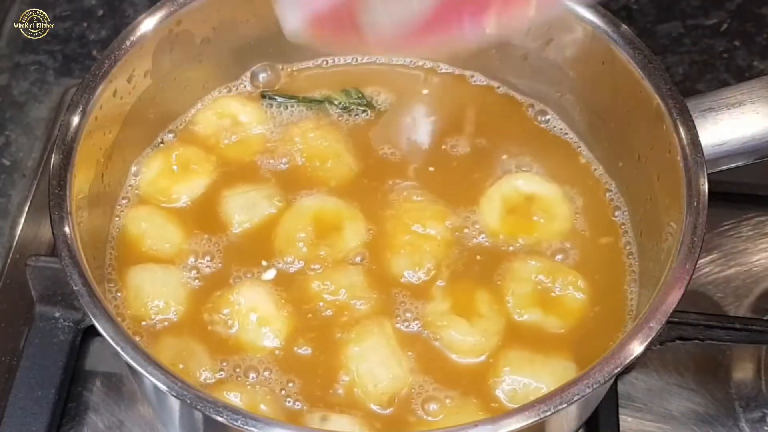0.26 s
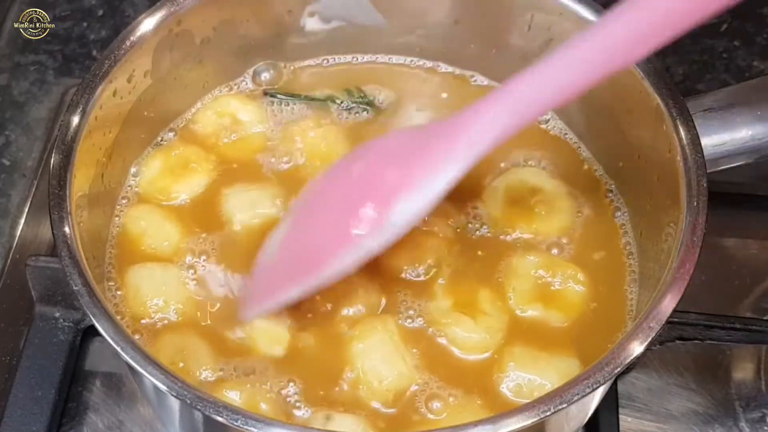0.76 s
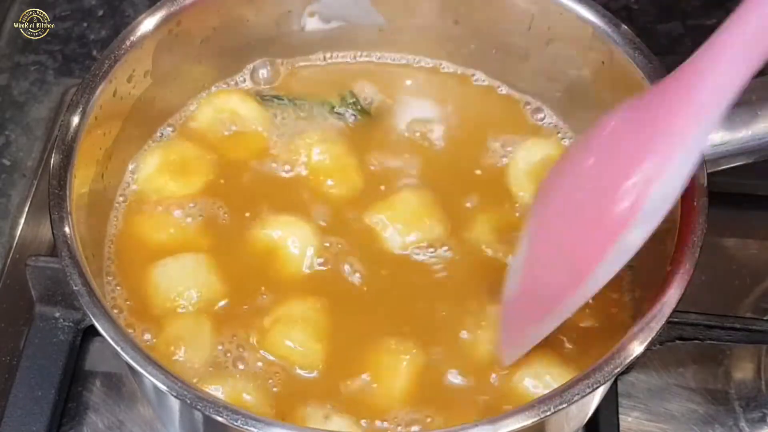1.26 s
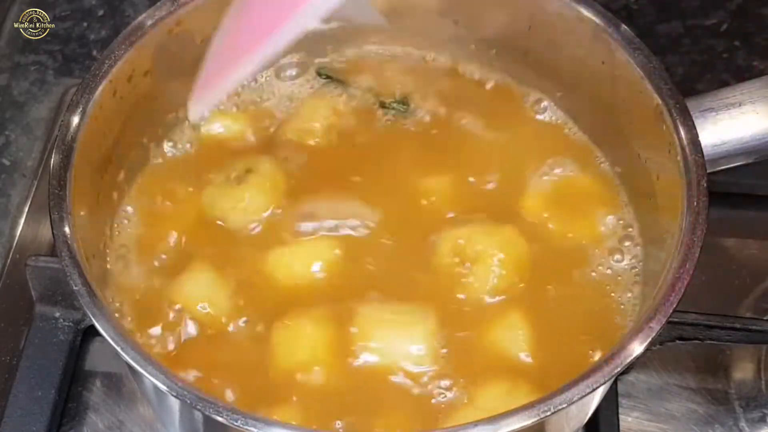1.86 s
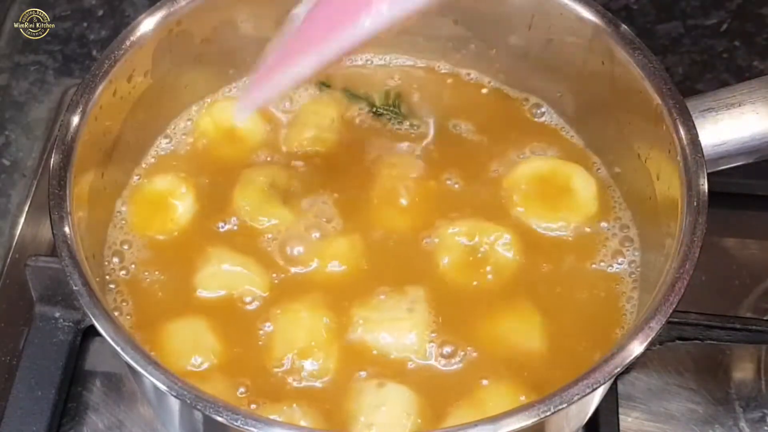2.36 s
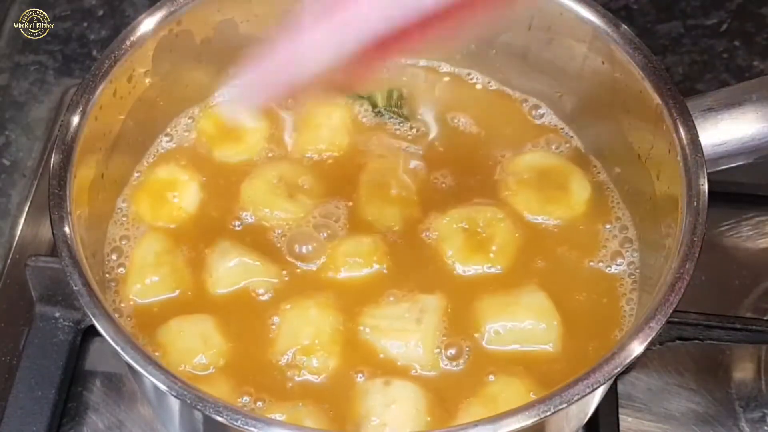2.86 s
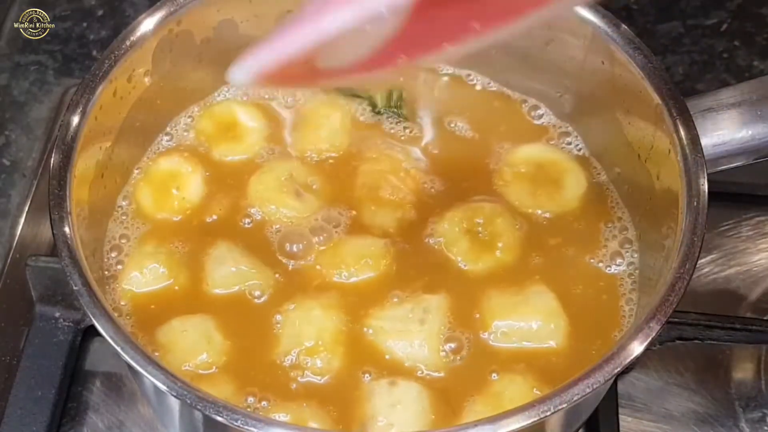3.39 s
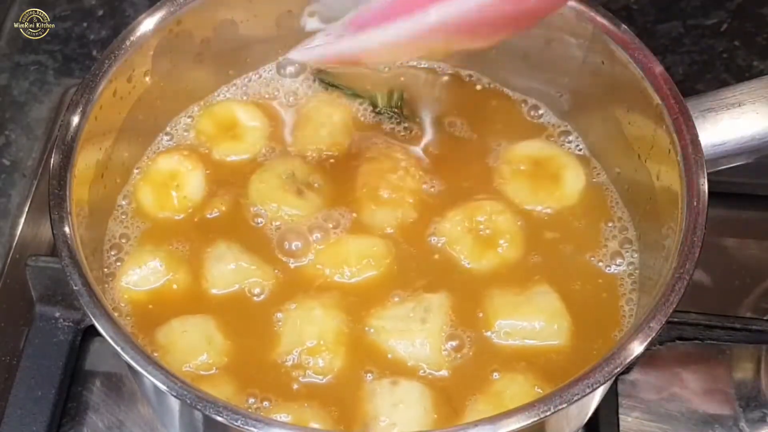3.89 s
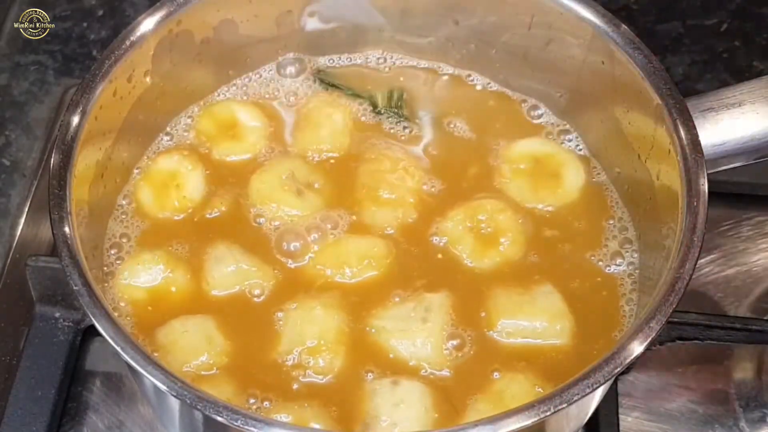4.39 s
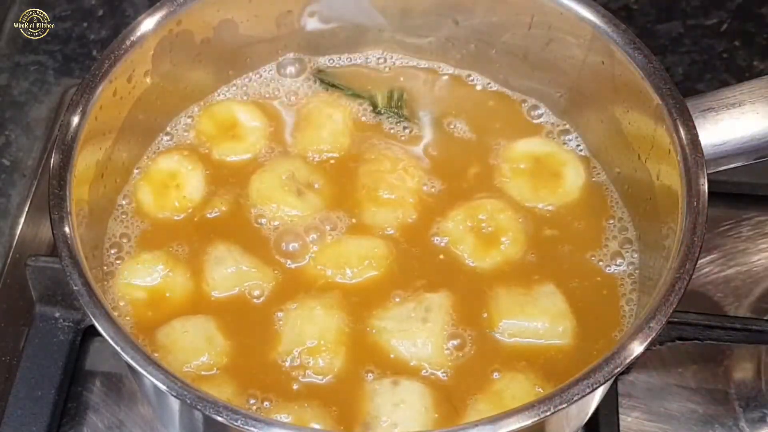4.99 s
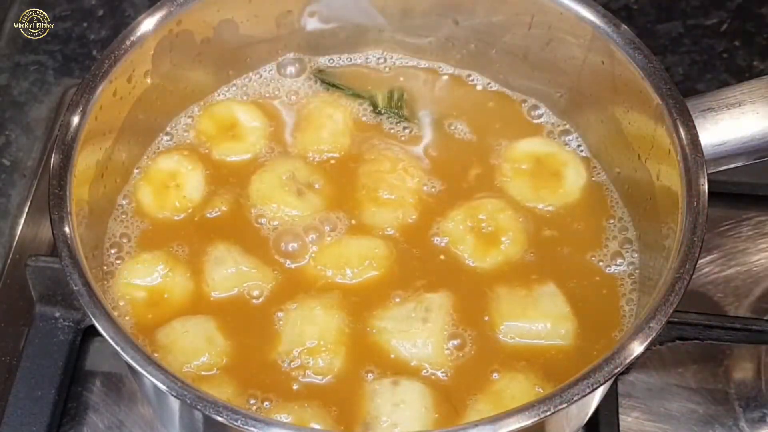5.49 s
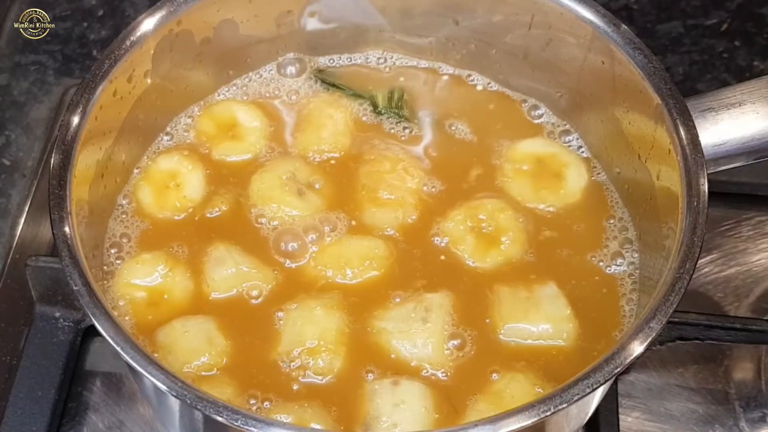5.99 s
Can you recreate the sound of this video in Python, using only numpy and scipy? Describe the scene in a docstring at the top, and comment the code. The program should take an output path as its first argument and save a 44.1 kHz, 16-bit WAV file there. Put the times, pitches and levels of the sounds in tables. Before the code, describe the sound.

A saucepan of syrup simmers over a gas burner, heard close in stereo in a small kitchen. Throughout, a deep flame roar around 100 Hz wanders irregularly by a few decibels, with a low-mid flutter and a steady, bright, wide hiss and fizz from the gas jets. Barely audible tiny bubbles tick at random across the pan. At about 1.27 s a soft spoon bumps the pan with a dull, muffled double knock; from 1.42 to 1.6 s syrup slops and quick rising bubbles plop. A small bubble at 2.7 s precedes a light, faint knock at 2.8 s. One faint plop comes at 4.2 s. Near 5.08 s a clearer woody thud lands with two weaker follow-ups, then a plop at 5.18 s. Between 5.47 and 5.63 s a soft rub and a cluster of low, rounded bubbles burst. The burner continues to the end, just past 6 s.

```python
"""In a kitchen, a saucepan of syrup simmers on a gas burner close to a two-port microphone.
The flame roars and flutters low and the gas jets hiss and fizz: shaped stereo noise, randomly wobbling in level.
Bubbles burst as short rising sines. A soft spoon bumps the pan and something thuds nearby: decaying modes.
The syrup slops and something soft shuffles: lumpy filtered noise. A short room tail follows these events."""
import sys
import numpy as np
from scipy import signal
from scipy.fft import rfft, irfft, next_fast_len
from scipy.io import wavfile
from scipy.ndimage import uniform_filter1d, map_coordinates

SR = 44100
rng = np.random.default_rng(int(sys.argv[2]) if len(sys.argv) > 2 else 0)


def generate_wav(sig):
    """Save sig (samples, or channels by samples) to the path in sys.argv[1] as 16-bit PCM at SR."""
    pcm = np.round(np.clip(np.atleast_2d(sig).T, -1, 1) * 32767).astype(np.int16)
    wavfile.write(sys.argv[1], SR, pcm)


N = 275625  # samples, 6.25 s


def amp(db):
    """Gain of a level in dB."""
    return 10 ** (np.asarray(db) / 20)


def unit(x):
    """Scale a signal to rms 1."""
    return x / np.sqrt(np.mean(x ** 2) + 1e-20)


def along(points, hz):
    """Read a curve of (Hz, value) points on a log frequency axis."""
    f, v = np.transpose(points)
    return np.interp(np.log(hz + 1), np.log(f + 1), v)


def wobble(rate):
    """A smooth random curve with rate knots a second."""
    knots = rng.standard_normal(int(N * rate / SR) + 4)
    return map_coordinates(knots, [np.arange(N) * rate / SR])


def filtered(x, response):
    """Filter a signal by a response given as a function of frequency in Hz."""
    m = next_fast_len(N + SR // 2)
    spectrum = rfft(x, m) * response(np.fft.rfftfreq(m, 1 / SR))
    return irfft(spectrum, m)[..., :N]


def sides(db):
    """Left and right gains for a left-minus-right level in dB."""
    return amp(np.array([db / 2, -db / 2]))


def patchy_noise(patchy_db):
    """Two independent noises that share patches of random gain over time and frequency."""
    z = signal.stft(rng.standard_normal((2, N)), nperseg=512)[2]
    field = rng.standard_normal(z.shape[1:])
    field = uniform_filter1d(field, size=5, axis=0)  # across frequency
    field = uniform_filter1d(field, size=8, axis=1)  # across time
    return signal.istft(z * amp(patchy_db * unit(field)), nperseg=512)[1][:, :N]


def rush(spectrum, patchy_db, ripple_hz=140):
    """Gas noise of rms 1, coloured by reflections and resonances and spread over both ports."""
    # greatest share of the noise that reaches both ports by other paths: f/Hz, share
    paths = [(250, 0), (400, .4), (1200, .75), (5000, .75), (12000, .62)]
    # left-right likeness, -1 to 1; near 5 kHz the ports hear the jets in opposite phase: f/Hz, likeness
    alike = [(40, .95), (90, .995), (230, .97), (330, .83), (500, .86), (770, .6), (1170, .05),
             (1700, -.35), (2740, .35), (3900, -.15), (4500, .2), (5000, -.75), (5450, -.85), (5900, 0),
             (15000, 0)]
    # balance of the ports: f/Hz, left minus right/dB
    lean = [(60, 5), (92, 3.5), (140, 4), (210, 0), (330, 2.5), (500, 6.5), (770, 4), (1170, 4),
            (1790, -1.5), (2740, 3), (4190, 0.5), (6410, 2), (9810, 4.5), (15000, 4.5)]
    # narrow resonances and dips of pan, grate and hob: f/Hz, width/Hz, left level/dB, right level/dB
    hollows = [(266, 30, 3, 3), (362, 30, 5, 5), (400, 30, 2, -1), (539, 60, 3, 3), (660, 50, 4, -4),
               (963, 55, 7, 1), (1030, 60, 2, -4), (1135, 30, -6, -2), (1338, 30, 6, 0), (1525, 60, -1, 4),
               (1600, 70, -3, -4), (1920, 70, 3, 1), (2100, 70, 4, 4), (2279, 12, 8, 5), (2422, 26, 4, 1),
               (2490, 110, 3, 0), (2850, 70, -6, -5), (2925, 70, 0, 3), (3350, 90, -5, -5),
               (4050, 90, 4, 6), (4330, 38, 4, 3), (5800, 120, -4, -3), (7262, 60, 3, 9),
               (8000, 500, 2, -3), (8500, 50, 5, -1), (9050, 400, 0, 3), (10350, 150, -1, -4),
               (13500, 300, 0, -4), (14110, 120, 4, -1), (14470, 150, 2, 4), (15006, 100, 3, 2),
               (15440, 70, 7, 9)]
    one, other = patchy_noise(patchy_db)

    # reflections off pan and hob: the same noise arrives again with a phase that wanders over frequency
    knots = np.cumsum(rng.normal(0, 2.69, 400))

    def share(hz):
        phase = np.interp(hz / ripple_hz, np.arange(len(knots)), knots)
        return np.clip(along(paths, hz), 0, .95) * (.35 * np.cos(phase) + 1j * np.sin(phase))

    again = filtered(one, share)
    fresh = filtered(other, lambda hz: np.sqrt(1 - abs(share(hz)) ** 2))
    pair = np.array([one, again + fresh])

    def mid_side(hz):
        turn = np.arccos(np.clip(along(alike, hz), -.9, 1)) / 2  # more side where the ports are less alike
        return amp(along(spectrum, hz)) * [np.ones_like(hz), np.tan(turn)]

    def port_colour(hz):
        lift = sum(np.outer(db, 1 / (1 + (2 * (hz - c) / w) ** 2)) for c, w, *db in hollows)
        return sides(along(lean, hz)) * amp(lift)

    mid, side = filtered(pair, mid_side)
    return unit(filtered(np.array([mid + side, mid - side]), port_colour))


def burner():
    """Turbulent flame roars with a small random wobble; one gas flow sways flutter, hiss and fizz a little."""
    # spectra of flame roar, flame flutter under the pan, gas jets, top of the jet noise: f/Hz, level/dB
    roar_spectrum, flutter_spectrum = [(13, -73), (22, -36), (38, -21.5), (51, -18.5), (63, -7.5),
                                       (86, 0.5), (114, 2.5), (133, -5.5), (152, -12), (200, -30),
                                       (260, -71), (440, -120)], [(94, -33), (160, 0), (264, 1.5), (328, -3),
                                                     (362, -5.5), (402, -9), (438, -2.5), (466, -22.5),
                                                     (496, -8.5), (518, -8.5), (716, -9), (900, -21),
                                                     (973, -18.5), (1210, -24), (1300, -23.5), (1690, -40),
                                                     (2860, -120)]
    hiss_spectrum, fizz_spectrum = [(650, -38), (1100, -6.5), (1200, -10), (1300, -5), (1610, -8.5),
                                    (1750, -2), (1980, -7), (2460, 0.5), (2760, -4.5), (3310, -8.5),
                                    (3650, -4), (4180, -1.5), (4690, -1), (5270, -32.5), (5600, -12.5),
                                    (7280, -44), (12300, -120)], [(3120, -64), (5300, -41), (6230, -5.5), (7050, -3),
                                                  (7800, -6), (8470, 1), (8790, -0.5), (9550, -4.5),
                                                  (10700, -7), (13200, -4), (14500, 0.5), (14900, 0),
                                                  (15900, -7.5)]
    # level of the roar, wandering by chance within a few dB: t/s, level/dB
    roar_levels = [(0, -39.5), (.35, -41.5), (.75, -38), (1.1, -42.5), (1.4, -40.5), (1.9, -38.5),
                   (2.35, -40.5), (2.7, -40), (2.9, -41.5), (3.3, -37), (3.6, -40.5), (4, -38.5),
                   (4.6, -39), (5.1, -39), (5.6, -42), (6.25, -38)]
    flutter_db, hiss_db, fizz_db = -48.5, -51, -46  # mid levels, before the sway
    flow = wobble(9.8)
    roar_db = np.interp(np.arange(N) / SR, *np.transpose(roar_levels))
    roar = amp(roar_db + 1.5 * wobble(5)) * rush(roar_spectrum, patchy_db=0.0)
    flutter = amp(flutter_db + 0.82 * flow) * rush(flutter_spectrum, patchy_db=0.03)
    hiss = amp(hiss_db + 0.43 * flow) * rush(hiss_spectrum, patchy_db=1.35)
    fizz = amp(fizz_db + 0.37 * flow) * rush(fizz_spectrum, patchy_db=1.57)
    return roar + flutter + hiss + fizz


def bubble(hz, cycles, t, order=1):
    """A bubble rings as a sine that rises near the surface; a higher order holds it, then cuts it at the burst."""
    life = cycles / hz  # s
    pitch = hz * (1 + .03 * t / life)
    attack = 1 - np.exp(-t * hz)
    return np.sin(2 * np.pi * pitch * t) * np.exp(-2 * (t / life) ** order) * attack


def simmer(count=900):
    """Tiny bubbles burst at random times, with random size, pitch and place from left to right."""
    when, size, pitch, place = rng.random((count, 4)).T
    hz = 600 * 6 ** pitch  # 600 to 3600 Hz
    t = np.arange(SR // 40) / SR
    rings = amp(-74.0 + 10 * size ** 2)[:, None] * bubble(hz[:, None], 4.2, t)
    at = ((when * N).astype(int)[:, None] + np.arange(len(t))).ravel()
    gains = sides(12 * (place - .5))
    return np.array([np.bincount(at, (g[:, None] * rings).ravel(), N + SR)[:N] for g in gains])


def thuds():
    """Soft, dull blows: decaying modes with slightly drifting phase, a longer contact slowing the onset."""
    # blows: t/s, level/dB, brightness (modes above 290 Hz)/dB, contact time/s, left minus right/dB
    blows = [(1.265, -26.5, -21, .003, 1.5), (1.284, -34, -20, .003, 1.5), (2.808, -35, -5, .002, 2.5),
             (5.0823, -26.5, -3, .0018, 2.5), (5.105, -33, -3, .0018, 2.5), (5.131, -37, -14, .002, 2.5)]
    # modes that a blow rings: f/Hz, level/dB, t60/s
    body = [(108, -9, .25), (200, -7, .15), (240, -3, .16), (266, -10, .75), (310, -11, .1), (366, -2, .2),
            (463, -14, .15), (530, -5, .1), (598, -11, .25), (665, -12, .08), (890, -24, .15)]
    out, t = np.zeros((2, N + SR)), np.arange(SR // 2) / SR
    for s, db, bright_db, contact, pan_db in blows:
        ring = np.zeros(len(t))
        for hz, level, t60 in body:
            mode_db = level + bright_db * (hz > 290) + rng.normal(0, 1) - 60 * t / t60
            drift = 0.0036 * np.cumsum(rng.standard_normal(len(t)))  # radians
            ring += amp(mode_db) * np.sin(2 * np.pi * hz * t + drift)
        rise = 1 - np.exp(-t / max(contact, 1e-4))
        out[:, round(s * SR):][:, :len(t)] += amp(db) * ring * rise * sides(pan_db)[:, None]
    return out[:, :N]


def plops():
    """Larger bubbles, most of them stirred up by the spoon, hold their ring until they burst."""
    # bubbles: t/s, level/dB, starting f/Hz, life/cycles, left minus right/dB
    bubbles = [(1.425, -48, 960, 9, 4), (1.443, -53, 2200, 40, 2), (1.459, -54, 2350, 24, 2),
               (1.478, -47, 950, 10, 2), (1.4835, -41, 785, 13, 0), (1.520, -47, 1490, 10, 6),
               (1.519, -53, 1800, 12, 6), (1.513, -55, 2450, 60, 3), (2.695, -52, 640, 8, 4),
               (4.22, -55, 970, 10, 4), (5.179, -49, 680, 5, 2), (5.466, -54, 1570, 28, -1),
               (5.472, -49, 930, 16, -1), (5.478, -53, 780, 14, -1), (5.486, -48, 1070, 10, -1),
               (5.489, -40.5, 550, 13, -2), (5.511, -45, 570, 9, -2), (5.532, -49, 550, 8, -2),
               (5.553, -44.5, 945, 13, -1), (5.570, -51, 920, 32, -1), (5.625, -50, 670, 12, 2)]
    out, t = np.zeros((2, N + SR)), np.arange(SR // 10) / SR
    for s, db, hz, cycles, pan_db in bubbles:
        ring = amp(db) * bubble(hz, cycles, t, order=3)
        out[:, round(s * SR):][:, :len(t)] += ring * sides(pan_db)[:, None]
    return out[:, :N]


def grainy(strokes, spectrum, lumps_db):
    """Friction or splash as lumpy noise that swells, holds and dies for each stroke."""
    rise_db_per_s, fall_db_per_s = 1400, 600
    t = np.arange(N) / SR
    level = np.zeros(N)
    for s, db, hold in strokes:
        before, after = np.maximum(s - t, 0), np.maximum(t - s - hold, 0)
        level += amp(db - rise_db_per_s * before - fall_db_per_s * after)
    grains = rng.standard_normal(N) * amp(lumps_db * wobble(150))
    return level * unit(filtered(grains, lambda hz: amp(along(spectrum, hz))))


def slosh():
    """Syrup slops round the spoon as it sweeps across the pan: strongly lumpy noise."""
    # slops: t/s, level/dB, hold/s
    slops = [(1.427, -62, .002), (1.448, -68, .02), (1.483, -61, .004), (1.521, -62, .002),
             (1.57, -64, .002)]
    # colour of the syrup: f/Hz, level/dB
    syrup = [(400, -30), (800, -6), (1500, 0), (2500, -1), (3500, -16), (6000, -30)]
    return grainy(slops, syrup, lumps_db=5) * sides(2.5)[:, None]


def shuffle():
    """Something soft drags on the counter: short rubs of gently lumpy noise."""
    # rubs: t/s, level/dB, hold/s
    rubs = [(5.472, -56, .035), (5.553, -61, .04)]
    # colour of the rub: f/Hz, level/dB
    cloth = [(250, -26), (450, -4), (580, -4), (750, 14), (1050, 1), (1300, 6), (2400, -27), (4000, -40)]
    return grainy(rubs, cloth, lumps_db=2) * sides(-2)[:, None]


def kitchen(x, t60=0.2):
    """A short tail of the room: decaying noise, different at each port."""
    t = np.arange(SR // 2) / SR
    tail = rng.standard_normal((2, len(t))) * amp(-60 * t / t60)
    return signal.fftconvolve(x, tail / np.linalg.norm(tail[0]), axes=1)[:, :N]


def scene():
    """The burner throughout, with the near sounds and the room's answer to them."""
    near = simmer() + thuds() + plops() + slosh() + shuffle()
    return burner() + near + amp(-18) * kitchen(near)


def record(dry):
    """The microphone keeps nothing above its band limit."""
    top_hz = 15520
    return filtered(dry, lambda hz: hz < top_hz)


dry = scene()
out = record(dry)
generate_wav(out)
```